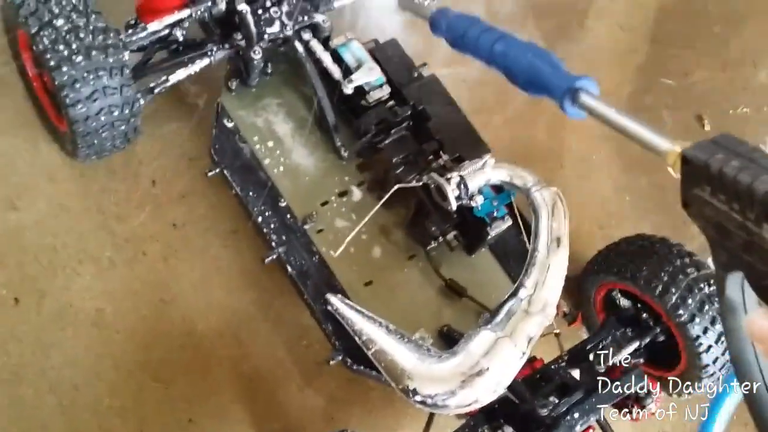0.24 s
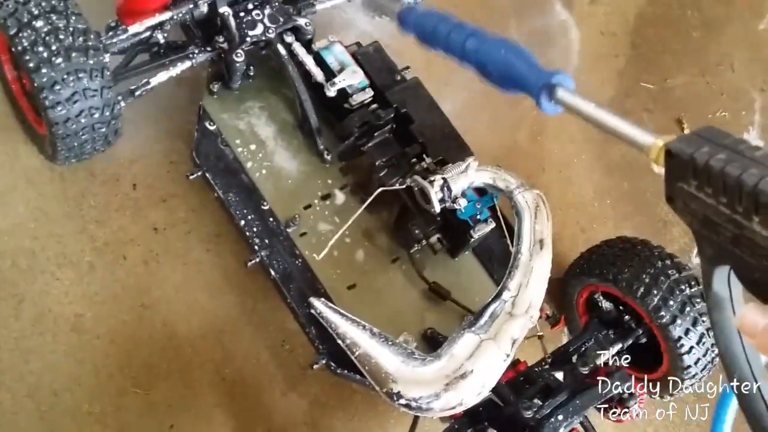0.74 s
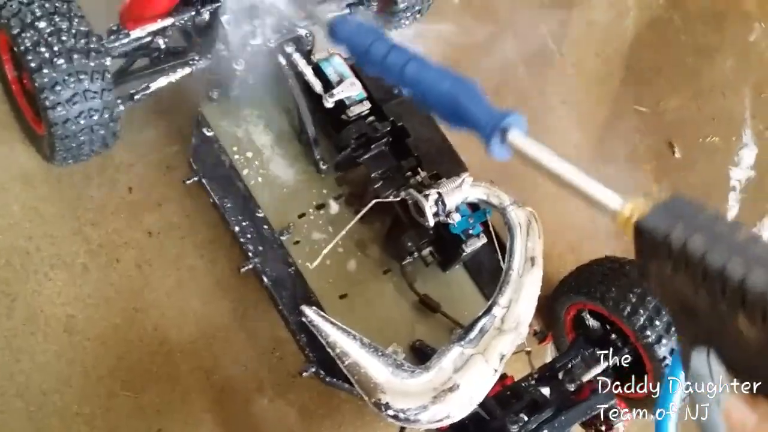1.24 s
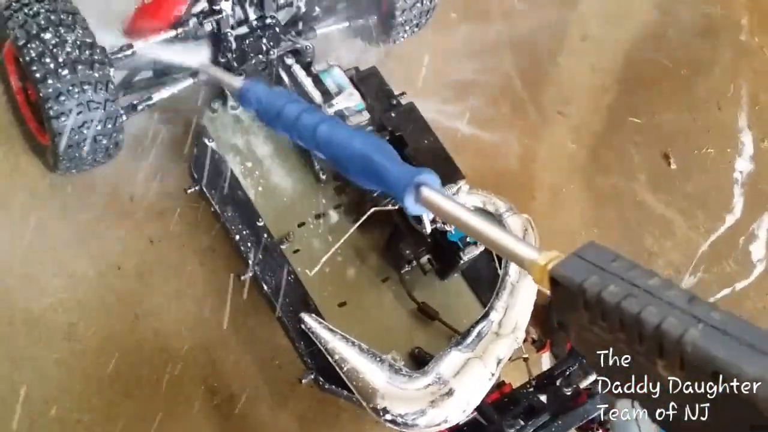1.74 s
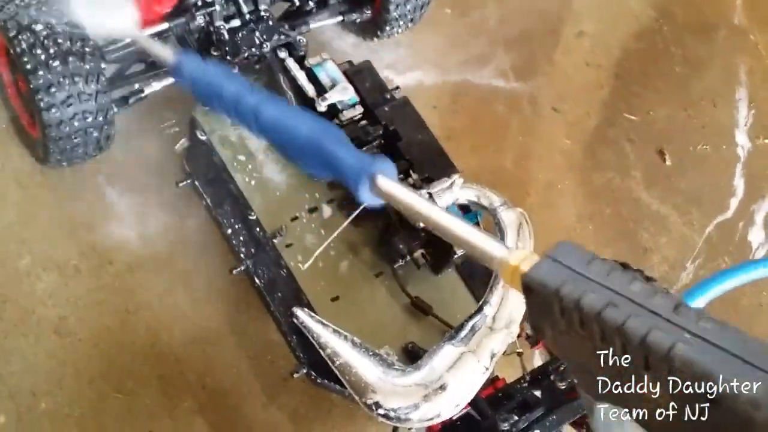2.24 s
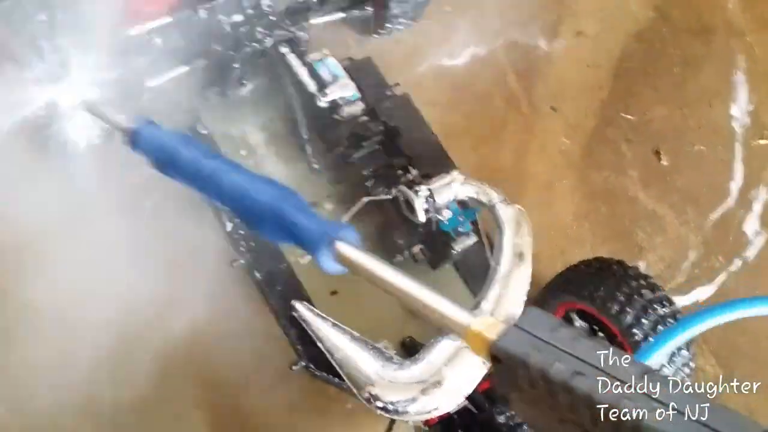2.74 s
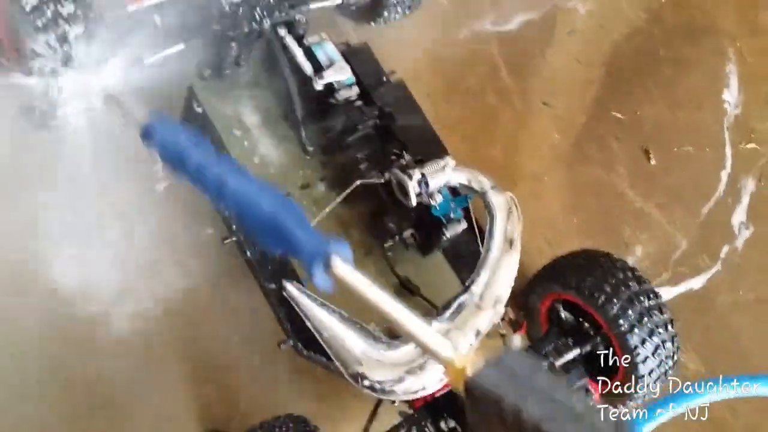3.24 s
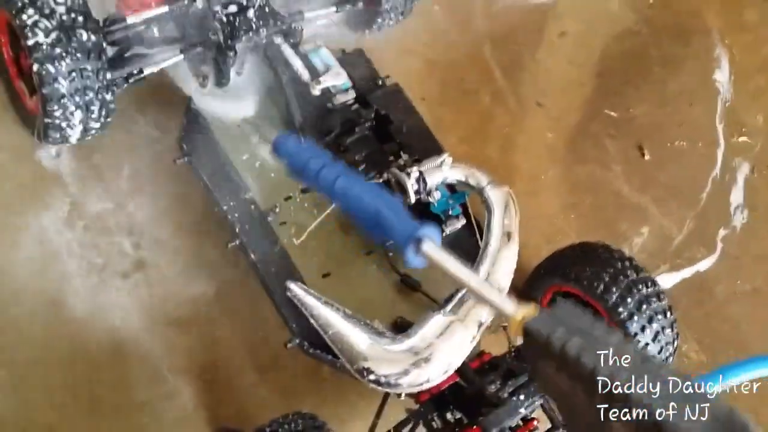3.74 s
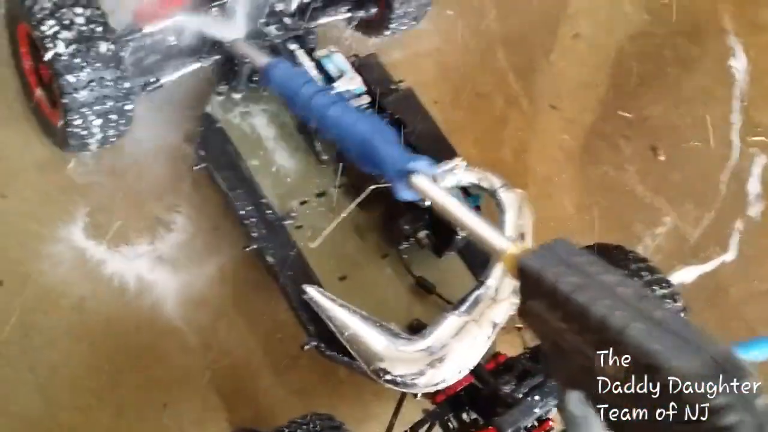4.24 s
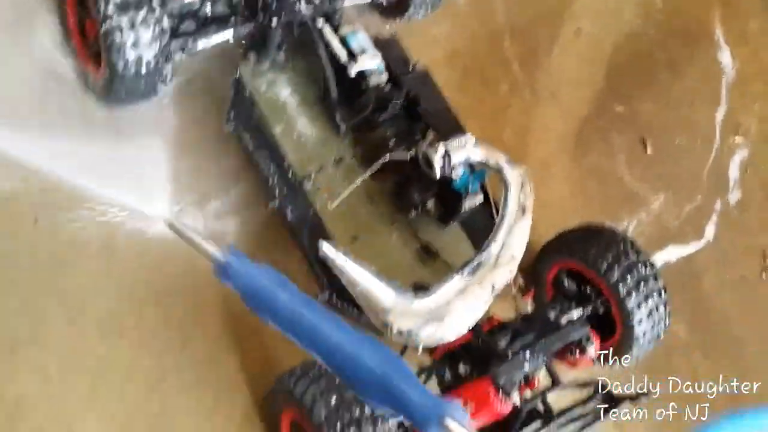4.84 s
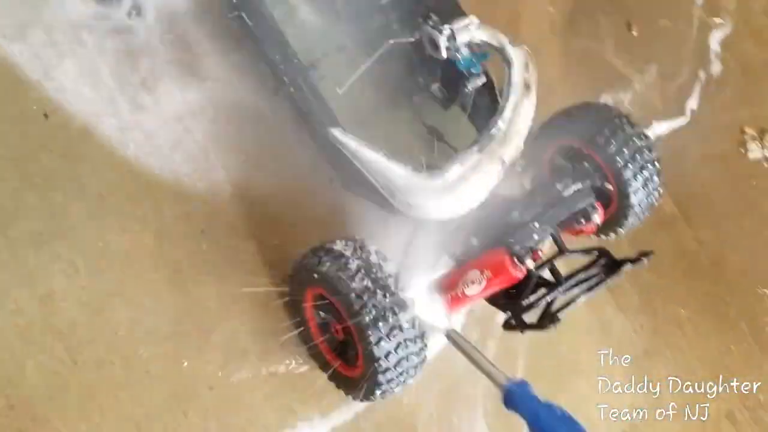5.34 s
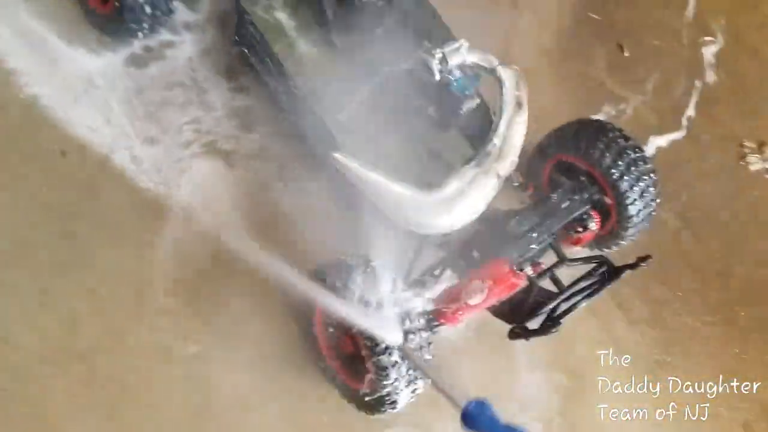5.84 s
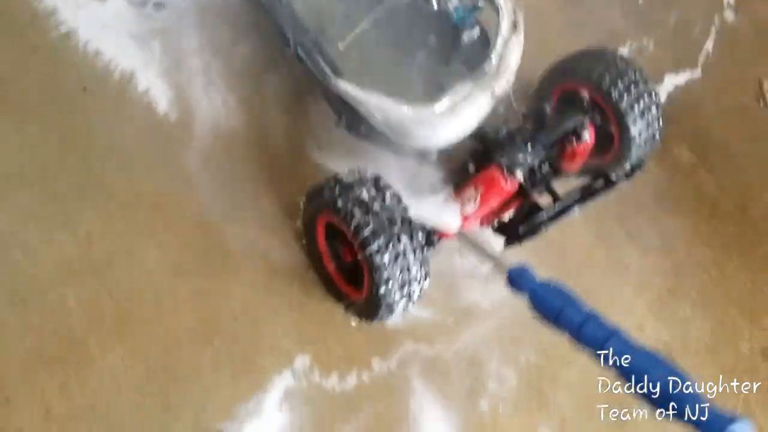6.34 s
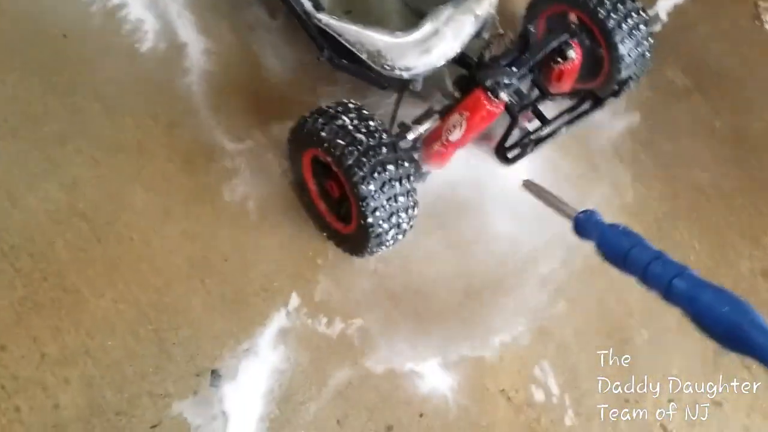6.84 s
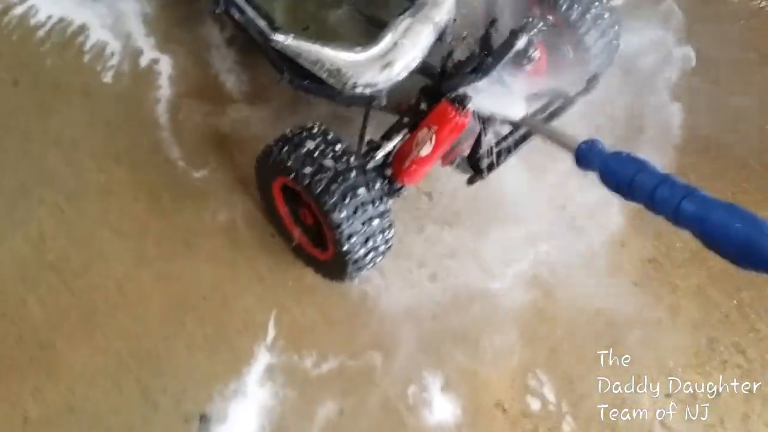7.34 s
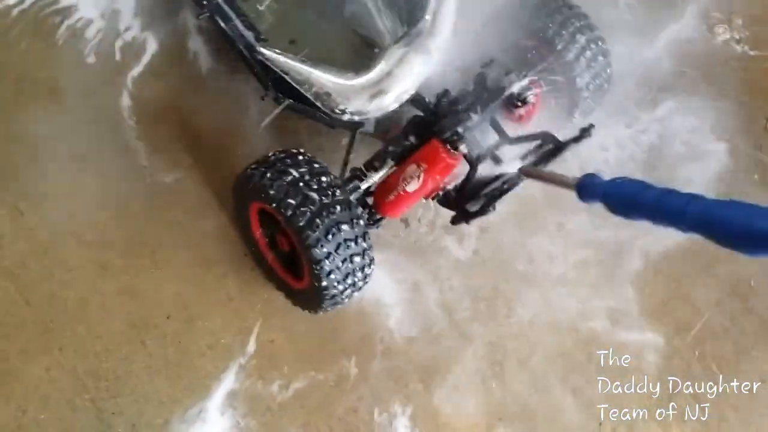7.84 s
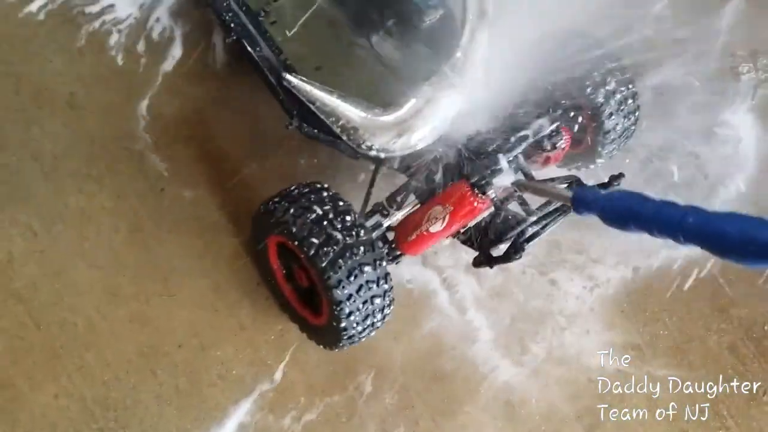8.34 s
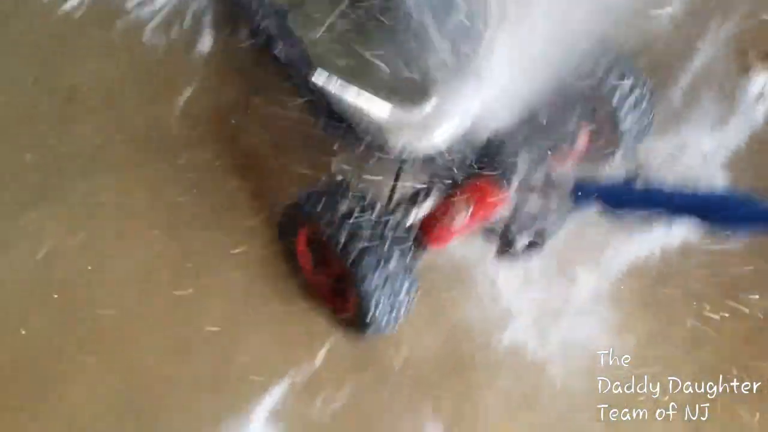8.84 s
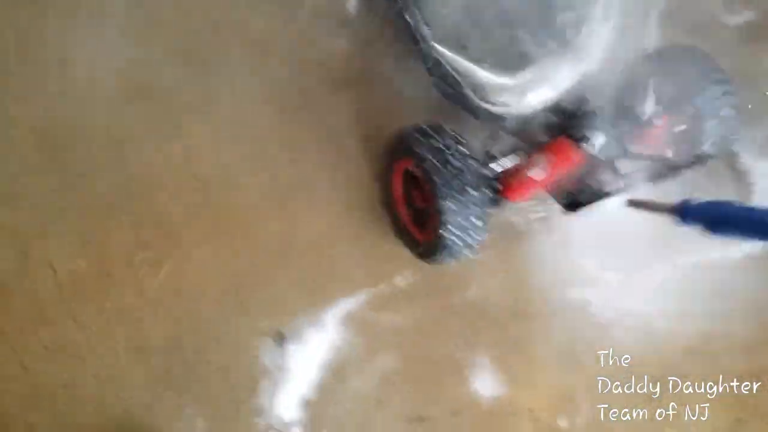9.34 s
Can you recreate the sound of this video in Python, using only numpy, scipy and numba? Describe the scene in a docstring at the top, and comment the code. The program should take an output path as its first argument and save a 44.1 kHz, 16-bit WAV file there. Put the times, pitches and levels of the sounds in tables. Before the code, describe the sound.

A pressure washer jet hisses loudly and throbs rapidly, drumming on the hollow plastic chassis and tyres of a model car, close up.

```python
"""A pressure washer rinses a model car on a wet concrete floor, the wand close to a hand-held phone.
From the start filtered noise hisses and throbs, and random drops ring resonances of chassis and tyres.
From about 4.3 s the drumming thins; near 5 s harmonics of the pump's strokes hum as the spray passes close.
From 6.3 s the drumming returns, with hard slaps near 7.4 and 7.9 s; close to the end the hum rises again.
Throughout, the air rushes low, a distant motor drones, and unrelated noises spread the spray cloud wide."""
import sys
import numpy as np
from scipy import signal
from scipy.fft import rfft, irfft
from scipy.io import wavfile
from scipy.ndimage import uniform_filter1d, map_coordinates
from numba import njit

SR = 44100
rng = np.random.default_rng(int(sys.argv[2]) if len(sys.argv) > 2 else 0)


def file_out(sig):
    """Save sig as 16-bit WAV at sys.argv[1]."""
    # one column per channel
    cols = np.atleast_2d(sig).T
    # limit, then scale
    lim = np.clip(cols, -1, 1)
    pcm = np.round(lim * 32767).astype(np.int16)
    wavfile.write(sys.argv[1], SR, pcm)


N = 423360
TIME = np.arange(N) / SR  # s
STROKE_HZ, THROB_HZ = 66.9, 13.39  # pump strokes; swing of the water pressure

# the jet's hiss as the wand moves nearer and farther: t/s, relative level/dB
HISS_LEVEL = [(0, -22.5), (0.5, -23.5), (1.1, -20), (1.45, -23), (2.0, -21.5), (2.7, -21), (2.8, -21.5),
              (3.45, -23), (3.65, -23.5), (4.15, -22), (4.28, -27), (4.82, -29), (5.25, -24), (6.26, -24),
              (6.3, -23), (6.55, -20.5), (7.2, -23), (7.55, -23), (7.7, -26), (7.87, -23.5), (8.25, -23),
              (8.9, -21), (9.2, -22.5), (9.25, -25), (9.4, -25.5), (9.6, -28)]
# the jet catches an edge or the tread and shatters:
# t/s, length/s, relative sizzle level/dB, relative fine mist level/dB
FLARES = [(0.08, 0.13, -27, -28), (0.68, 0.38, -31, -45), (1.06, 0.13, -24, -33), (1.22, 0.11, -26, -23),
          (1.46, 0.06, -32, -22.5), (1.813, 0.04, -22, -35), (2.274, 0.04, -23, -40),
          (2.72, 0.48, -42, -28.5), (3.216, 0.3, -30.5, -29.5), (4.383, 0.048, -24.5, -42),
          (4.53, 0.21, -29, -38), (4.73, 0.35, -36, -48), (5.08, 0.2, -30.5, -38),
          (5.285, 0.13, -26.5, -24), (5.43, 0.066, -21, -24), (5.55, 0.75, -43, -31),
          (6.275, 0.084, -29, -22.5), (7.397, 0.06, -22, -36), (7.63, 0.15, -47, -27),
          (7.797, 0.1, -29, -38), (8.97, 0.068, -35, -27), (9.408, 0.086, -32, -30)]
# spectra of the jet's drops, its fine mist and its sizzle: f/Hz, spectral level/dB
HISS_SPECTRUM = [(300, -24), (1000, -15), (2000, -3), (3000, 0.4), (4300, -0.7), (5500, -1), (7500, 1),
                 (10000, -3.5), (12000, -3.5), (15500, -14)]
MIST_SPECTRUM = [(7000, -24), (10000, -3), (12500, -2), (15500, -1.5)]
SIZZLE_SPECTRUM = [(1500, -17), (3200, 2.5), (5500, 3.5), (9000, 1), (12000, -11), (15500, -18)]
FLARE_EDGE_S = 0.016
MIST_DB = -6  # mist of the free jet, set against the hiss level before the mist's own gain


def jet(throb):
    """Turbulent break-up: countless drops give broadband noise, mist its top, struck edges a sizzle."""
    hiss_db, = curves(HISS_LEVEL)
    sizzle_power = 0
    mist_power = undb(hiss_db + MIST_DB) ** 2
    for start, length, sizzle_db, mist_db in FLARES:
        on = gate(start, length, FLARE_EDGE_S, FLARE_EDGE_S)
        sizzle_power = sizzle_power + on * undb(sizzle_db) ** 2
        mist_power = mist_power + on * undb(mist_db) ** 2
    hiss = undb(1.26) * unit(colour(noise(), HISS_SPECTRUM))
    patter = undb(-4.5) * unit(colour(drops(rate=9000, scatter_db=3.5), HISS_SPECTRUM))
    mist = undb(5 + 1.3 * walk(18)) * unit(colour(noise(), MIST_SPECTRUM))
    sizzle = undb(1.5) * unit(colour(noise(), SIZZLE_SPECTRUM))
    spray = undb(hiss_db) * (hiss + patter)
    spray = spray + np.sqrt(mist_power) * mist + np.sqrt(sizzle_power) * sizzle
    flutter_db = 0.63 * walk(45) + 0.39 * walk(12)
    return spray * undb(0.54 * throb + flutter_db)


# how strongly the spray throbs: t/s, relative depth
THROB_DEPTH = [(0, 1), (3.4, 1.6), (4.5, 0.59), (7.5, 1.2), (9.6, .6)]
SAG_SHARPNESS = 2.6  # 1 is an even swing; higher makes each sag briefer


def pressure():
    """Amplitude modulation: pressure swings about once in five strokes, with broad swells and brief sags."""
    first_swell_s = 0.054
    depth, = curves(THROB_DEPTH)
    swing = (1 - np.cos(2 * np.pi * THROB_HZ * (TIME - first_swell_s))) / 2
    sag = swing ** SAG_SHARPNESS
    uneven = 1 + 0.34 * walk(1.26)
    return 2 * depth * (np.mean(sag) - sag) * uneven


# nominal resonances of panels, small stiff parts, tyres and frame: f/Hz, width/Hz, relative level/dB
PANEL_MODES = [(865, 170, -1), (1106, 185, 6), (1364, 150, 3.5), (1577, 320, 5)]
PART_MODES = [(2115, 590, 2), (2445, 510, 2.5), (3180, 720, -5), (4100, 1450, -4)]
TYRE_MODES = [(490, 75, -6.5), (569, 57, -3)]
FRAME_MODES = [(159.5, 19, -6), (468, 183, -4.5), (707, 307, 0.5)]
# pitch of the small parts under the jet, lower on the open floor, higher at the rear bumper: t/s, f/Hz
PART_RING = [(0, 2180), (0.9, 2080), (1.2, 2200), (1.42, 1950), (1.68, 2380), (2.05, 2100), (2.6, 2270),
             (4.1, 2180), (4.7, 1860), (6.2, 1750), (6.4, 2400), (7.9, 2360), (8.6, 2510), (9.6, 2410)]
PART_REST_HZ = 2260  # pitch at which the small parts ring with their listed modes
# a slug of water slaps the chassis: t/s, relative level/dB
SLAPS = [(0.728, -20), (1.386, -16), (7.428, -12.5), (7.888, -12)]
SLAP_DECAY_S = 0.008
# short narrow-band rings, each at one pitch: t/s, length/s, relative level/dB, f/Hz
NARROW_RINGS = [(0.69, 0.14, -23.5, 1100), (1.0, 0.086, -23.5, 1120), (1.377, 0.1, -20, 1400),
                (2.0, 0.12, -27.5, 1000), (2.165, 0.077, -22.5, 1270), (2.548, 0.091, -25, 1380),
                (3.53, 0.21, -33, 1070), (3.895, 0.1, -23, 1360), (7.264, 0.26, -25, 1370),
                (7.84, 0.092, -23, 1310), (8.3, 0.3, -28, 1220), (8.762, 0.08, -28, 1310),
                (8.87, 0.075, -23.5, 1580), (9.12, 0.1, -24.5, 1430)]
NARROW_RING_WIDTH_HZ, NARROW_RING_EDGE_S = 236, 0.012
# the jet presses on a soft tyre wall, which booms: t/s, length/s, relative level/dB, f/Hz
BOOMS = [(0.55, 0.42, -43.5, 220), (1.75, 0.5, -47, 231), (2.28, 0.17, -39.5, 234), (2.93, 0.2, -48, 219),
         (3.62, 0.13, -31, 545), (4.36, 0.22, -38.5, 565), (6.33, 0.17, -45, 171), (7.2, 0.21, -43, 195),
         (7.66, 0.18, -45, 148), (9.23, 0.3, -44, 175)]
WALL_WIDTH_HZ, WALL_EDGE_S = 69, 0.02


def drumming(throb, panel_gain, part_gain, low_gain, spot_hz, tyre_share):
    """Impact excitation of resonators: water drums on chassis, parts, frame and tyres, with narrow rings."""
    stroke = np.cos(2 * np.pi * STROKE_HZ * TIME)
    beat = undb(0.5 * throb + 0.19 * stroke + 0.89 * walk(60))
    panel_stiffness = (spot_hz / np.mean(spot_hz)) ** 0.83
    part_hz, = curves(PART_RING)
    slap = 0
    for start, db in SLAPS:
        slap = slap + undb(db) * (TIME >= start) * np.exp(-np.abs(TIME - start) / SLAP_DECAY_S)
    panels = struck(drops(rate=4000, scatter_db=4.0), PANEL_MODES,
                    patchy_db=1.0, drift=0.021, stiffness=panel_stiffness)
    parts = struck(drops(rate=9000, scatter_db=2.5), PART_MODES,
                   patchy_db=0.2, drift=0.019, stiffness=part_hz / PART_REST_HZ)
    tyres = struck(drops(rate=2500, scatter_db=2.0), TYRE_MODES, patchy_db=2.0, drift=0.031)
    frame = struck(drops(rate=2500, scatter_db=3.0), FRAME_MODES, patchy_db=0.0, drift=0.0088)
    walls = ringing(drops(rate=2500, scatter_db=1.0), BOOMS, WALL_WIDTH_HZ, WALL_EDGE_S)
    narrow_rings = ringing(drops(rate=2500, scatter_db=2.0), NARROW_RINGS,
                           NARROW_RING_WIDTH_HZ, NARROW_RING_EDGE_S)
    body = np.sqrt(tyre_share) * tyres + np.sqrt(1 - tyre_share) * undb(1.1) * frame
    chassis = panels * np.hypot(panel_gain, slap) + parts * part_gain
    return beat * (chassis + narrow_rings + body * low_gain + walls)


# the jet dwells on a part of the car: t/s, length/s, relative levels of panels/dB, small stiff parts/dB
# and frame with tyres/dB, nominal ring of the panel f/Hz, tyre share (0-1)
DWELLS = [(0.017, 0.24, -25, -26, -33.5, 1320, 0.63), (0.27, 0.4, -28.5, -25, -36, 1240, 0.44),
          (0.677, 0.31, -21.8, -21.8, -30, 1185, 0.55), (1.002, 0.11, -23, -20.5, -29.5, 1120, 0.6),
          (1.12, 0.24, -27, -23, -35, 1410, 0.23), (1.385, 0.12, -29, -19.5, -38, 1450, 0.6),
          (1.542, 0.34, -23.5, -20.5, -34.5, 1250, 0.64), (1.888, 0.26, -25, -17.5, -34.5, 1300, 0.6),
          (2.151, 0.17, -22, -20, -31, 1280, 0.3), (2.323, 0.18, -33, -27, -36, 1330, 0.45),
          (2.494, 0.22, -24.5, -21.5, -35, 1360, 0.55), (2.92, 0.13, -35, -31, -40, 1200, 0.4),
          (3.24, 0.24, -33.5, -33, -45, 1270, .7), (3.506, 0.13, -23, -23.5, -35, 1190, 0.8),
          (3.598, 0.15, -28, -25.5, -31, 1260, 0.7), (3.784, 0.078, -26, -36, -34.5, 1240, 0.3),
          (3.89, 0.095, -27.5, -24.5, -37, 1320, 0.4), (3.99, 0.24, -26.5, -23.3, -39, 1390, 0.4),
          (4.22, 0.26, -35, -32.5, -35, 1360, 0.4), (4.448, 0.12, -44, -44, -39, 1200, 0.4),
          (4.6, 0.73, -44, -38, -49, 1450, 0), (5.126, 0.71, -35.5, -38, -47, 1370, 0),
          (5.42, 0.17, -35, -32, -39, 1300, 0.4), (5.738, 0.6, -34.5, -34.5, -39, 1420, 0.05),
          (6.278, 0.07, -24, -29, -42, 1260, 0), (6.368, 0.1, -22, -23.5, -30, 1440, .08),
          (6.507, 0.42, -25, -29, -33.5, 1280, .08), (6.98, 0.15, -20, -26.5, -28.5, 1290, 0.01),
          (7.14, 0.14, -33, -30, -42, 1300, .15), (7.245, 0.12, -22.5, -23.5, -29, 1350, 0.04),
          (7.378, 0.093, -18, -30, -27, 1270, 0.34), (7.49, 0.082, -21.5, -22, -31.5, 1380, 0.4),
          (7.58, 0.32, -33.5, -45, -39.5, 1340, 0.2), (7.818, 0.091, -20.5, -24.5, -32.5, 1450, 0.2),
          (7.948, 0.11, -24.5, -25, -31, 1310, 0.1), (8.12, 0.12, -27.5, -31, -36, 1300, .15),
          (8.305, 0.14, -21.5, -27, -32.5, 1290, 0.2), (8.453, 0.4, -23.5, -23, -34.5, 1380, 0.2),
          (8.833, 0.12, -23, -23, -34, 1520, .15), (8.985, 0.26, -25.5, -25.5, -35, 1390, 0.2),
          (9.257, 0.11, -29.5, -28.5, -34.5, 1290, 0.24), (9.46, 0.2, -32, -37, -36.5, 1150, 0)]
ARRIVE_S, LEAVE_S = 0.033, 0.028  # the jet slides on to a part and off it
# stray drops that reach the car wherever the jet points
STRAY_PANEL_DB, STRAY_PART_DB, STRAY_LOW_DB = -40.5, -34, -47.5
STRAY_RING_HZ, STRAY_TYRE_SHARE = 1260, 0.3


def contact():
    """Power summation of dwells: gains of panels, parts, frame with tyres; mean panel ring; tyre share."""
    panel = np.full(N, undb(STRAY_PANEL_DB) ** 2)
    part = np.full(N, undb(STRAY_PART_DB) ** 2)
    low = np.full(N, undb(STRAY_LOW_DB) ** 2)
    # ring and tyre share are averaged with power as the weight
    ring, tyre = panel * STRAY_RING_HZ, low * STRAY_TYRE_SHARE
    for start, length, panel_db, part_db, low_db, ring_hz, share in DWELLS:
        on = gate(start, length, ARRIVE_S, LEAVE_S)
        on_panel = on * undb(panel_db) ** 2
        on_low = on * undb(low_db) ** 2
        panel = panel + on_panel
        part = part + on * undb(part_db) ** 2
        low = low + on_low
        ring = ring + on_panel * ring_hz
        tyre = tyre + on_low * share
    return np.sqrt(panel), np.sqrt(part), np.sqrt(low), ring / panel, np.clip(tyre / low, 0, 1)


def struck(force, modes, patchy_db, drift, stiffness=1):
    """Modal superposition: drops excite each mode, whose level and pitch wander at random."""
    out = 0
    for hz, width, db in modes:
        centre = hz * stiffness * np.exp(drift * walk(9))
        # two passes make the skirts of each mode steep
        ring = resonate(resonate(force, centre, 2. * width), centre, 2. * width)
        out = out + ring * undb(db + patchy_db * walk(9))
        force = np.roll(force, SR // 2, axis=1)  # shifted in time, so modes do not share impacts
    return unit(out)


def ringing(x, spots, width_hz, edge_s):
    """Narrow-band resonance: drops ring at the listed pitches, gated to each listed span."""
    power = 0
    pitches = []
    for start, length, db, pitch in spots:
        power = power + gate(start, length, edge_s, edge_s) * undb(db) ** 2
        pitches += [(start, pitch), (start + length, pitch)]
    hz, = curves(pitches)
    ring = resonate(resonate(x, hz, 2. * width_hz), hz, 2. * width_hz)
    return unit(ring) * np.sqrt(power)


def drops(rate, scatter_db):
    """Shot noise: impacts at random moments, rate a second, of scattered sizes and either sign."""
    size = noise()
    lands = rng.random(size.shape) < rate / SR
    sign = np.sign(rng.random(size.shape) - 0.5)
    return unit(lands * sign * undb(size * scatter_db))


# pump strokes carried by the jet: t/s, relative level/dB
HUM = [(0, -61), (4.1, -64), (4.7, -52.5), (5.15, -44), (5.55, -48.5), (6.27, -45.5), (6.32, -77),
       (9.15, -66), (9.27, -46), (9.6, -55)]
# harmonics of the strokes: multiple of the stroke rate, level relative to HUM/dB
HUM_ORDERS = [(1, -3), (2, -4), (3, -6.5)]


def pump_hum(phase):
    """Harmonic series: the pump's strokes buzz louder where the jet passes close."""
    close_db, = curves(HUM)
    out = 0
    for multiple, db in HUM_ORDERS:
        strength = undb(close_db + db + 0.5 * walk(6.4))
        out = out + np.sqrt(2) * strength * np.cos(multiple * phase + 2 * np.pi * rng.random())
    return out


def stroke_phase():
    """Phase modulation: the steady stroke rate wavers slightly; in radians."""
    return 2 * np.pi * STROKE_HZ * TIME + 0.04 * walk(8.1)


# air dragged along by the spray: t/s, relative level/dB
DRAUGHT = [(0, -44), (0.32, -47.5), (0.85, -40.5), (1.5, -47.5), (2.4, -41), (2.79, -49), (4.1, -46),
           (4.9, -45), (5.9, -41), (6.9, -46), (7.7, -44.5), (9.0, -43.5), (9.6, -39.5)]
# spectrum of that air: f/Hz, spectral level/dB
RUSH_SPECTRUM = [(20, -46), (38, -32), (52, -10), (70, -8), (100, -4.5), (150, -4), (210, 5.5), (300, 5),
                 (400, 3), (600, -3), (1500, -25)]


def draught():
    """Entrainment: air dragged by the spray rushes low, with a deeper buffet where the jet is closest."""
    db, = curves(DRAUGHT)
    close_db, = curves(HUM)
    rush = unit(colour(noise(), RUSH_SPECTRUM))
    buffet = unit(colour(noise(), [(20, -40), (40, -21), (60, -2), (160, 6), (300, -5), (1000, -40)]))
    return rush * undb(db + 3.0) + buffet * undb(close_db - 1.0)


# drone of the distant motor and pump: multiple of the throb rate, mid level/dB
MOTOR_ORDERS = [(4, -67), (5, -74), (6, -69), (7, -65), (9, -63), (10, -62.5), (12, -59.5), (15, -57),
                (16, -60), (18, -61), (22, -61), (26, -61.5)]


def motor_drone(phase):
    """Rotational orders: the distant motor and pump drone at multiples of the throb rate."""
    out = 0
    for multiple, db in MOTOR_ORDERS:
        turn = multiple * phase * THROB_HZ / STROKE_HZ
        strength = undb(db + 1.5 * walk(2.45))
        out = out + np.sqrt(2) * strength * np.cos(turn + 2 * np.pi * rng.random())
    return out


ROOM_DB, ROOM_T60_S = -10.5, 0.12  # echoes of floor and walls close by, relative to the direct sound
ROOM_SHIFT_HZ = 0.2015  # how fast the echoes change


def room(x):
    """Reverberation: decaying echoes of floor and walls add a fine colour that shifts as the wand moves."""
    t = np.arange(SR // 4) / SR
    echoes = rng.standard_normal((2, len(x), len(t))) * np.exp(-np.log(1000) * t / ROOM_T60_S)
    echoes = echoes / np.linalg.norm(echoes, axis=2, keepdims=True)
    here, there = (signal.fftconvolve(x, e, axes=1)[:, :N] for e in echoes)
    turn = 2 * np.pi * ROOM_SHIFT_HZ * TIME
    wet = np.cos(turn) * here + np.sin(turn) * there
    return (x + undb(ROOM_DB) * wet) / np.hypot(1, undb(ROOM_DB))


def mottle(x, band_hz, rate, depth_db):
    """Interference: paths between car and floor make narrow bands swell and sink as the wand moves."""
    f, t, z = signal.stft(x, SR, nperseg=1024)
    cells = rng.standard_normal((int(f[-1] / band_hz) + 2, int(t[-1] * rate) + 2))
    grid = np.meshgrid(f / band_hz, t * rate, indexing="ij")
    field = map_coordinates(cells, grid, order=3, mode="nearest")
    reach = np.minimum(f / 1500, 1)[:, None]  # long waves are hardly touched
    return signal.istft(z * undb(depth_db * reach * field), SR)[1][:, :N]


# bearing of the spray: t/s, lead at the left port/ms
BEARING = [(0, -0.018), (1, 0.038), (2.2, 0.14), (3.5, 0.2), (3.8, 0.06), (4.3, 0.091), (4.7, 0.22),
           (5.3, -0.051), (6.5, -0.017), (9.6, -0.11)]
# spray from the left bends round the phone and cancels one band at each port, left then right:
# f/Hz, width/Hz, level at full depth/dB
SIDE_DIPS = [(7900, 2600, -3.5), (3230, 760, -3)]
SIDE_LEAD_MS = 0.14  # bearing at which the dips are fully deep


def shadow(ports):
    """Diffraction: the farther left the spray lands, the deeper the dip at each port, up to a limit."""
    lead_ms, = curves(BEARING)
    aside = np.clip(lead_ms / SIDE_LEAD_MS, 0, 1)
    dipped = []
    for x, (hz, width, db) in zip(ports, SIDE_DIPS):
        band = resonate(x[None], np.full(N, 1. * hz), 1. * width)[0]
        dipped.append(x + (undb(db * aside) - 1) * band)
    return np.array(dipped)


def delay(x, ms):
    """Propagation delay: read x a moving time later."""
    return map_coordinates(x, [np.arange(N) - ms * SR / 10 ** 3], order=3, mode="reflect")


@njit
def resonate(x, hz, width):
    """Second-order resonance: state-variable band-pass on each row, moving centre, gain 1 there."""
    y, band, low = np.empty_like(x), np.zeros(len(x)), np.zeros(len(x))
    for i in range(len(hz)):
        g, damping = np.tan(np.pi * hz[i] / SR), width / hz[i]
        for r in range(len(x)):
            v = (band[r] + g * (x[r, i] - low[r])) / (1 + g * (g + damping))
            band[r] = 2 * v - band[r]
            low[r] = low[r] + 2 * g * v
            y[r, i] = damping * v
    return y


def noise():
    """Incoherence: three unrelated white noises, the jet's core and two parts of the spray cloud."""
    return rng.standard_normal((3, N))


def colour(x, points):
    """Linear filtering: shape the spectrum by (f/Hz, level/dB) points on a log-frequency axis."""
    hz, db = np.transpose(points)
    f = np.maximum(np.fft.rfftfreq(N, 1 / SR), 1)
    return irfft(rfft(x) * undb(np.interp(np.log(f), np.log(hz), db)), N)


def walk(rate):
    """Slow random modulation: random levels slewed from one to the next each 1 / rate s; rms 1."""
    k = int(SR / rate)
    return unit(uniform_filter1d(np.repeat(rng.standard_normal(N // k + 1), k), k)[:N])


def gate(start, length, attack_s, release_s):
    """Power envelope: share of full power with a smooth attack, hold and release."""
    attack = (1 + np.tanh((TIME - start) / attack_s)) / 2
    release = (1 + np.tanh((start + length - TIME) / release_s)) / 2
    return attack * release


def curves(table):
    """Linear interpolation: each column of a table, joined by straight lines in time."""
    s, *columns = np.transpose(table)
    return [np.interp(TIME, s, c) for c in columns]


def unit(x):
    """Normalisation: scale to rms 1."""
    return x / np.sqrt(np.mean(x ** 2))


def undb(db):
    """Logarithmic level: decibels to amplitude gain."""
    return 10 ** (np.asarray(db) / 20)


PAN_DB = -0.2  # left minus right


def scene():
    """Interaural-style cues: the impact spot leads at one port, while the spray cloud surrounds both."""
    lead_ms, = curves(BEARING)
    throb = pressure()
    wash = jet(throb) + drumming(throb, *contact()) + draught()
    core, mid, side = mottle(room(wash), band_hz=130, rate=8, depth_db=1.67)
    direct = np.array([delay(core, -lead_ms / 2), delay(core, lead_ms / 2)])
    # long waves are alike at both ports, short ones much less so
    mid = colour(mid, [(300, 0.4), (1000, -1.7), (2200, -1.5), (4200, 5.5), (5700, 2.0), (7000, 3.0)])
    side = colour(side, [(100, -10.0), (400, -9.0), (1000, -5.0), (2200, -0.5),
                         (4200, 6.5), (5700, -0.5), (7000, 3.5)])
    cloud = np.array([mid + side, mid - side])
    ports = undb(-5.5) * (direct + cloud)
    balance = undb(np.array([[PAN_DB], [-PAN_DB]]) / 2)
    phase = stroke_phase()
    return shadow(ports) * balance + pump_hum(phase) + motor_drone(phase)


# how much of the finest hiss gets round the phone to the left port: t/s, level/dB
LEFT_TOP = [(0, 4), (1.4, 0), (1.75, -2), (2.5, -3), (2.75, 6), (3.47, 6), (3.57, -2), (5, -3), (9.6, -6)]
# ring of the right port, strongest when the spray faces it: t/s, f/Hz, relative level/dB
PORT_RING = [(0, 8700, 5.5), (1.1, 8800, 3.5), (2.1, 8100, 3), (2.4, 8220, 4.5), (3.25, 8400, 7.5),
             (3.5, 8330, 7.5), (3.7, 8700, 2.5), (4.9, 8300, 2.5), (5.3, 8550, 8.5), (5.55, 8480, 10),
             (6.2, 8500, 8.5), (7.3, 8660, 6), (7.65, 8600, 9.5), (8.05, 8600, 6.5), (9.1, 8700, 5.5),
             (9.6, 8800, 7.5)]
# colour of the two microphone ports: f/Hz, level/dB
LEFT_PORT = [(300, -0.65), (1100, 2.5), (2200, 1.24), (3400, 0), (4200, -5.5), (5500, 2.2), (7400, 0.5),
             (8700, -6.5), (9600, -7), (10400, -5.5), (11300, -4), (12700, -10), (13600, -9), (15500, -17)]
RIGHT_PORT = [(300, 2), (1100, 3), (1600, 0.5), (2200, -0.5), (3400, -1.5), (4300, -4.5), (5600, 2.5),
              (7100, -4), (8000, 0.5), (9300, 2), (11000, 0), (13000, -2.5), (15500, -4)]
TOP_HZ = 15520  # upper band limit


def record(dry):
    """Transduction: the left port is shaded, the right one rings; peaks round off, the top is cut steeply."""
    ring_hz, ring_db = curves(PORT_RING)
    top_db, = curves(LEFT_TOP)
    top = colour(dry[0], [(10000, -44), (12500, -7), (13500, -2)])
    ring = resonate(dry[1:], ring_hz, 1100.0)[0]
    left = colour(dry[0] + (undb(top_db) - 1) * top, LEFT_PORT)
    right = colour(dry[1] + (undb(ring_db + 1) - 1) * ring, RIGHT_PORT)
    heard = np.array([left, right])
    rounded = heard / (1 + (heard / 0.92) ** 8) ** (1 / 8)
    top_cut = signal.ellip(12, 0.1, 80, TOP_HZ, fs=SR, output="sos")
    return signal.sosfilt(top_cut, rounded)


dry = scene()
out = record(dry)
file_out(out)
```